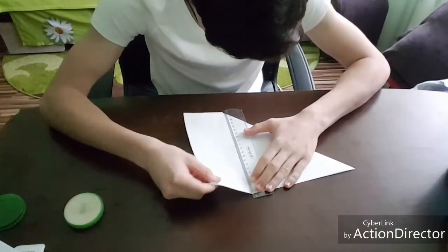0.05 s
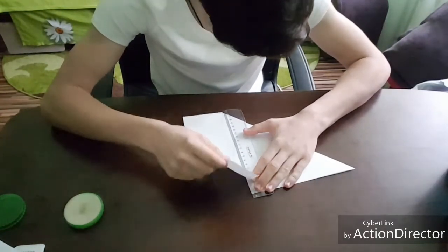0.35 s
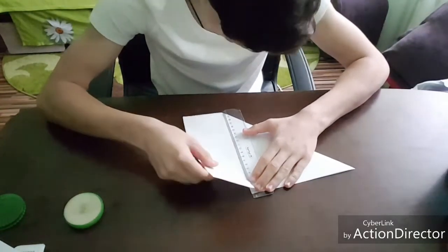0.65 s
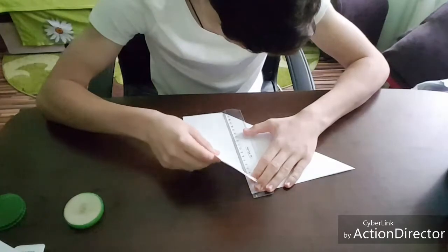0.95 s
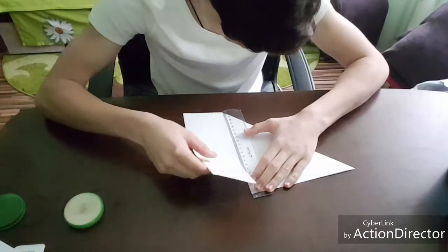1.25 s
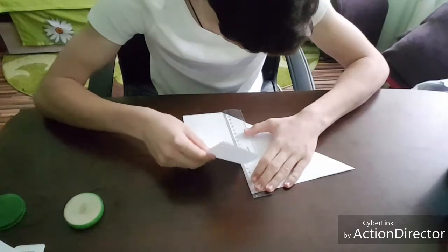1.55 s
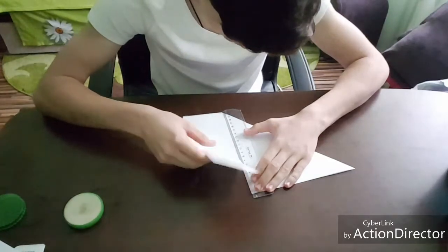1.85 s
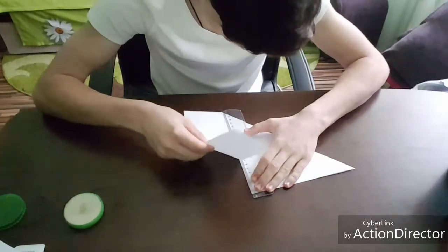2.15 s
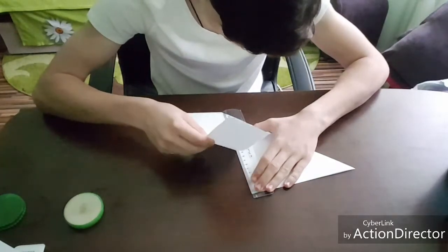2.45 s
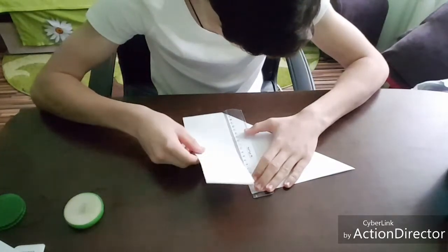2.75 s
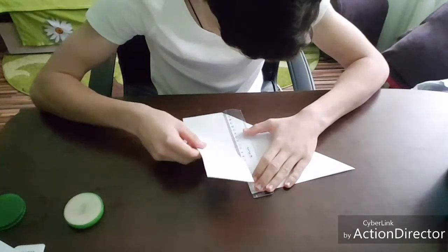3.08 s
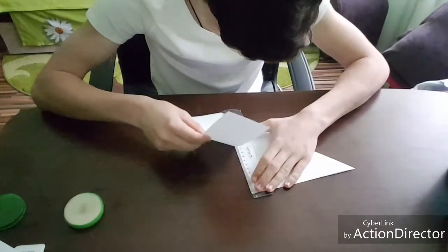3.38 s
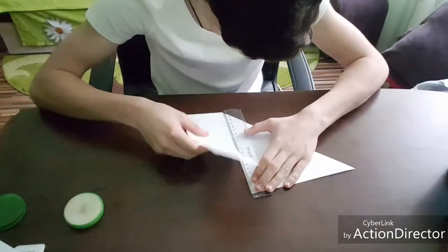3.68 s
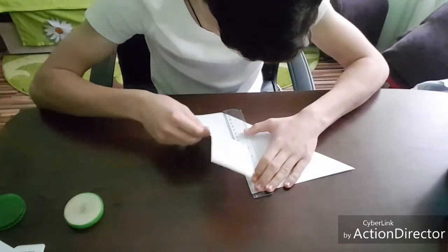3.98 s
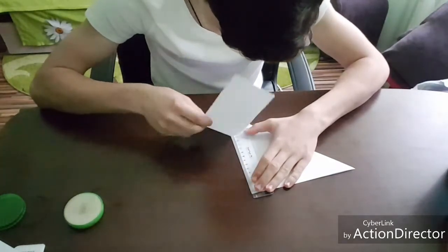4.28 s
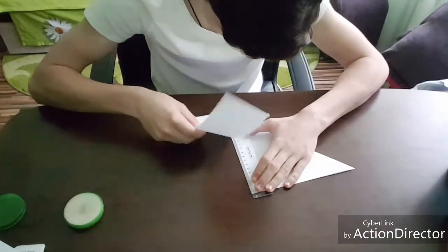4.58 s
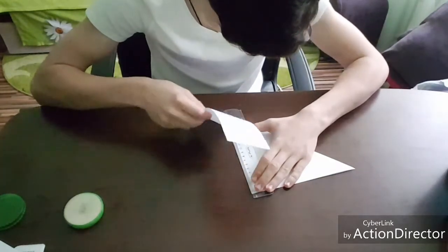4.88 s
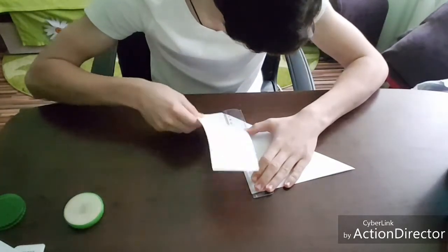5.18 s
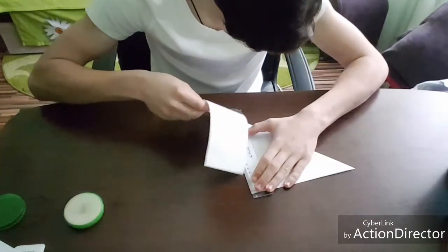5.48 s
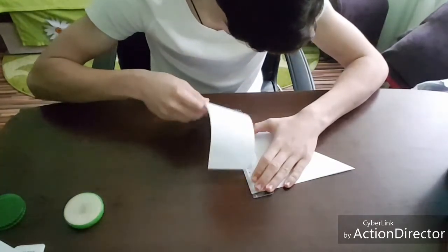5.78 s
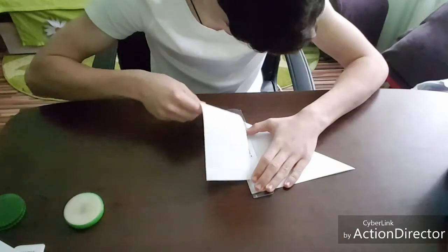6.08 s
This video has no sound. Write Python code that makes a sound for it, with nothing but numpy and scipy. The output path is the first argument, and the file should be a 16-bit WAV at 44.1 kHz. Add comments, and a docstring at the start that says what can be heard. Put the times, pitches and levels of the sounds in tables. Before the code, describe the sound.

Damp paper is torn by hand along a ruler in a series of short rips. Each is an uneven crackle with a few sharp snaps, a hollow rattle of the sheet and a low rumble through the wooden table. Between pulls the loose flap buckles with dull pops and whispers under the fingers. The microphone is close, in stereo, in a small quiet room.

```python
"""A small furnished room, close to a wooden table, in stereo: damp paper is torn along a ruler.
Each short rip is a run of uneven slips with a few loud cracks: a snap and an avalanche of breaking
fibres that also shakes the sheet. The tugs rumble through the table and boom in the taut flap;
between pulls the loose flap buckles with dull pops and slides under the fingers.
Short room reflections and a faint steady room tone lie behind the paper."""
import sys
import numpy as np
from scipy import signal
from scipy.fft import rfft, irfft, next_fast_len
from scipy.io import wavfile
from scipy.ndimage import uniform_filter1d

SR = 44100
rng = np.random.default_rng(int(sys.argv[2]) if len(sys.argv) > 2 else 0)


def persist_wave(psi):
    """Save psi, clipped to +-1, as 16-bit WAV."""
    counts = np.round(np.clip(psi, -1, 1) * 32767).astype(np.int16)
    wavfile.write(sys.argv[1], SR, np.atleast_2d(counts).T)


N = 274743

# pulls along the ruler: start_s, length_s, crackle_db, rattle_db, rumble_db
RIPS = [(0.267, 0.12, -39, -34, -58), (0.428, 0.01, -50, -50, -48.5), (0.987, 0.067, -51.5, -41, -47),
        (1.07, 0.068, -43.5, -38, -45), (1.631, 0.04, -55.5, -51.5, -56), (1.695, .12, -47.5, -48, -48.5),
        (2.318, 0.039, -42, -39.5, -48.5), (2.448, 0.026, -42.5, -38.5, -45.5),
        (2.52, 0.041, -53, -52, -53.5), (3.437, 0.064, -40.5, -41, -48.5), (4.185, 0.067, -39.5, -34, -47),
        (4.334, 0.072, -43.5, -43, -45.5), (4.825, 0.028, -55, -51, -53), (4.88, 0.13, -50.5, -43.5, -44.5),
        (5.501, 0.046, -42.5, -32.5, -48), (5.6, 0.012, -51, -46, -57), (5.658, 0.056, -41.5, -38, -75)]
# the loose flap buckles: time_s, level_db
FLAP_POPS = [(0.524, -45), (0.758, -56), (0.945, -29.5), (1.498, -54), (1.534, -51), (2.803, -47),
             (3.804, -44), (3.887, -33.5), (4.466, -34), (4.718, -40), (5.135, -40), (5.27, -39.5),
             (5.287, -44), (5.488, -32), (5.862, -46), (6.11, -40.5)]


def amp(db):
    """Decibels to gain."""
    return 10 ** (np.asarray(db) / 20)


def unit(x):
    """x at rms 1."""
    return x / np.sqrt(np.mean(x ** 2) + 1e-20)


def along(points, hz):
    """Rows of frequency_hz, value, read on a log frequency axis."""
    freqs, values = np.transpose(points)
    return np.interp(np.log(hz + 1), np.log(freqs + 1), values)


def filtered(x, response):
    """x through a filter whose gain is response(hz)."""
    size = next_fast_len(N + SR // 2)
    return irfft(rfft(x, size) * response(np.fft.rfftfreq(size, 1 / SR)), size)[..., :N]


def coloured(x, spectrum, size=4096):
    """x through a minimum-phase filter of energy 1 with the given spectrum."""
    gain = amp(along(spectrum, np.fft.rfftfreq(size, 1 / SR)))
    cepstrum = irfft(np.log(gain + 1e-6))
    cepstrum[1:size // 2] *= 2
    cepstrum[size // 2 + 1:] = 0
    ring = irfft(np.exp(rfft(cepstrum)))
    return signal.fftconvolve(x, ring[None] / np.linalg.norm(ring), axes=1)[:, :N]


def add(track, s, sound):
    """Lay a sound into a track at time s."""
    start = max(round(s * SR), 0)
    part = track[:, start:start + sound.shape[1]]
    part += sound[:, :part.shape[1]]


def swells(rows):
    """A bell-shaped gain for each movement: middle_s, length_s, level_db."""
    t = np.arange(0, N, 32) / SR
    power = sum(amp(db) ** 2 * np.exp(-(2 * (t - s) / length) ** 2) for s, length, db in rows)
    return np.interp(np.arange(N) / SR, t, np.sqrt(power))


def grains(count, rate_hz, spread_db):
    """Sparse impulses of scattered sizes, at rms 1."""
    occurs = rng.random(count) < rate_hz / SR
    size = amp(spread_db * np.clip(rng.standard_normal(count), -2, 2))
    sign = rng.choice([-1, 1], count)
    return unit(occurs * sign * size)


def avalanche(t60_s, snap, rate_hz, spread_db):
    """A snap, sized against the grains' rms, then dying grains that stop as the tension is spent."""
    t = np.arange(SR // 8) / SR
    tension = np.exp(-(t / .055) ** 4)
    envelope = amp(-60 * t / t60_s) * tension
    force = envelope * grains(len(t), rate_hz, spread_db)
    force[0] -= snap
    return force * np.linalg.norm(envelope) / np.linalg.norm(force)


def radiated(force, t60_s, scatter):
    """Mid and side sound of a force on the sheet: direct, plus waves that rebound from its edges."""
    t = np.arange(SR // 40) / SR
    waves = rng.standard_normal((2, len(t))) * amp(-60 * t / t60_s)
    waves *= scatter / np.linalg.norm(waves, axis=1, keepdims=True)
    waves[0, 0] += 1  # direct sound; the side gets it a few samples later
    waves[1, rng.integers(1, 8)] += rng.choice([-1, 1])
    waves /= np.linalg.norm(waves, axis=1, keepdims=True)
    return signal.fftconvolve(force[None], waves, axes=1)


def pull_db(age_s, length_s, sag_db_per_s=85.5, release_db_per_s=528):
    """The pull sags as the paper gives way, and lets go at the end of a rip."""
    return -sag_db_per_s * age_s - release_db_per_s * np.maximum(age_s - length_s, 0)


def cracks_and_slips(count=20):
    """Every advance of the tear: time_s, crackle_db, rattle_db, t60_s, snap."""
    # a tough bundle of fibres gives way at once: time_s, crackle_db, rattle_db
    cracks = [(0.24, -54, -49.5), (0.317, -28, -27), (0.386, -36.5, -37), (0.45, -45.5, -47),
              (0.484, -44.5, -47), (1.009, -40.5, -34.5), (1.103, -35, -33), (1.142, -38, -37.5),
              (1.671, -45, -43), (1.734, -41, -38.5), (1.7626, -30, -31.5), (2.278, -39, -44),
              (2.418, -52, -44), (2.48, -40.5, -39.5), (2.566, -41, -40), (3.392, -42.5, -44),
              (3.454, -33, -39.5), (3.486, -33.5, -32), (3.515, -39, -38.5), (4.21, -29, -51),
              (4.257, -33.5, -57), (4.296, -35, -41), (4.326, -27, -41), (4.84, -47, -48),
              (4.916, -39, -34.5), (4.939, -31, -25.5), (4.964, -28.5, -25.5), (5.395, -57, -46),
              (5.423, -44.5, -32.5), (5.452, -41, -26.5), (5.497, -29, -24.5), (5.539, -29.5, -25),
              (5.592, -40, -36), (5.694, -31.5, -29), (5.721, -35, -36.5)]
    crack_t60_s, crack_snap = .034, 3.4
    slip_t60_s, slip_snap = .059, 1.26
    gap_s, scatter_db, jerk_db = .008, 2, 4
    stall_s, stall_db = .016, 3.5  # a bundle holds up the tear just before it cracks
    rows = [(*crack, crack_t60_s, crack_snap) for crack in cracks]
    for s, length, crackle_db, rattle_db, _ in RIPS:
        ages = gap_s * (np.arange(count) + rng.uniform(-.5, .5, count))
        until_crack = np.array(cracks)[:, :1] - (s + ages)
        stalled = np.any((until_crack > 0) & (until_crack < stall_s), axis=0)
        levels = pull_db(ages, length) + scatter_db * rng.standard_normal(count) - stall_db * stalled
        ages[0], levels[0] = 0, jerk_db  # a rip opens with a stronger slip
        for age, db in zip(ages, levels):
            rows.append((s + age, crackle_db + db, rattle_db + db, slip_t60_s, slip_snap))
    return rows


def tear():
    """The same breaks are heard as bright fibre crackle and as the lower rattle of the taut sheet."""
    # tone of the breaking fibres: frequency_hz, level_db
    fibre_spectrum = [(1590, -22.5), (2700, -1.5), (3380, -5.5), (4410, -2), (5400, -6.5), (6120, -4),
                      (7600, -4.5), (8250, -1.5), (9430, -6.5), (10000, -4.5), (12500, -6), (15200, -12.5),
                      (16000, -36)]
    # hollow tone of the paper's rattle, as heard close to the table: frequency_hz, level_db
    rattle_spectrum = [(26, -47), (45, -44.5), (112, 2.5), (146, -5.5), (184, -3.5), (344, -3.5),
                       (442, -5.5), (715, -4), (870, -10), (1220, -2), (1330, -10), (1430, -4), (1940, -17),
                       (2240, -5.5), (3200, -36.5), (4160, -19.5), (7040, -120)]
    # how crisply the fibres break as the tear advances: time_s, treble_db
    crispness = [(.4, 1), (1.05, 5), (1.7, -2), (4.9, -3)]
    crackle, rattle = np.zeros((2, 2, N))
    for s, crackle_db, rattle_db, t60_s, snap in cracks_and_slips():
        force = avalanche(t60_s, snap, rate_hz=5500, spread_db=4.5)
        breaks = radiated(force, t60_s=.011, scatter=.45)
        add(crackle, s, amp(crackle_db) * breaks)
        add(rattle, s, amp(rattle_db) * breaks)
    treble = filtered(crackle, lambda hz: 1 / (1 + (10000 / (hz + 1)) ** 8))
    treble_db = np.interp(np.arange(N) / SR, *np.transpose(crispness))
    crackle += treble * (amp(treble_db) - 1)
    # a small sheet radiates little bass
    low_cut = signal.butter(2, 170, "highpass", fs=SR, output="sos")
    rattle = signal.sosfilt(low_cut, coloured(rattle, rattle_spectrum))
    return amp(-2.0) * coloured(crackle, fibre_spectrum) + amp(-2.03) * rattle


def table_rumble():
    """The jerky pull passes through ruler and hand into the table top, whose low modes rumble."""
    # modes of the table top: pitch_hz, width_hz, level_db
    modes = [(109, 26.4, 5), (182, 87, 3), (220, 53, 6.5), (374, 72, -4.5)]
    # the hand bumps the table: middle_s, length_s, level_db
    bumps = [(.66, 0.014, -48.5), (3.815, 0.04, -53.5), (4.2, 0.023, -44.5), (5.28, 0.052, -55.5)]
    nudge_s, nudge_db = .025, -21  # each pop of the flap also nudges the table
    nudges = [(s + nudge_s / 2, nudge_s, db + nudge_db) for s, db in FLAP_POPS]
    push = swells(bumps + nudges)[None]
    age = np.arange(SR // 4) / SR
    for s, length, _, _, rumble_db in RIPS:
        add(push, s, amp(rumble_db + pull_db(age, length))[None])

    def wood(hz):
        """The resonances summed with alternating signs."""
        return sum((-1) ** k * amp(db) * 1j * hz * width / (pitch ** 2 - hz ** 2 + 1j * hz * width)
                   for k, (pitch, width, db) in enumerate(modes))

    energy = np.mean(np.abs(wood(np.fft.rfftfreq(SR, 1 / SR))) ** 2)
    return amp(-3.0) * filtered(push * rng.standard_normal((2, N)), wood) / np.sqrt(energy)


def flap_booms(waver_hz=12.1):
    """The lowest mode of the taut flap; its pitch depends on the grip and wavers with the tension."""
    # the flap sounds briefly like a drum skin: middle_s, length_s, pitch_hz, level_db
    booms = [(0.416, 0.099, 245, -55), (1.1, 0.043, 210, -46), (3.497, .06, 172.4, -44.5),
             (4.36, 0.067, 184.3, -46), (4.946, 0.015, 384.7, -44), (5.458, 0.012, 400, -38.5),
             (5.509, 0.042, 325, -38)]
    sound = np.zeros((2, N))
    t = np.arange(-SR // 5, SR // 5) / SR
    for s, length, hz, db in booms:
        waver = unit(uniform_filter1d(rng.standard_normal(len(t)), size=600))
        phase = 2 * np.pi * np.cumsum(hz + waver_hz * waver) / SR
        envelope = amp(db) * np.exp(-2 * (t / length) ** 2)
        add(sound, s + t[0], envelope * np.array([np.sin(phase), np.cos(phase)]))
    return sound


def flap_pops(rise_s=.004):
    """The limp flap flips over with a soft, dull pop that takes a moment to build up."""
    # tone of the limp flap: frequency_hz, level_db
    flap_spectrum = [(50, -8), (200, -8.5), (350, -1.5), (520, -1.5), (720, -1), (1200, -0.5), (1750, -11),
                     (2400, -11), (3500, -28.5), (16000, -47)]
    pops = np.zeros((2, N))
    for s, db in FLAP_POPS:
        force = avalanche(t60_s=.061, snap=1.5, rate_hz=12000, spread_db=.5)
        force *= 1 - np.exp(-np.arange(len(force)) / SR / rise_s)
        add(pops, s - rise_s / 2, amp(db) * radiated(force, t60_s=.0076, scatter=.36))
    return amp(-2.5) * coloured(pops, flap_spectrum)


def paper_slides():
    """Paper rubs on skin and table: a fine, grainy whisper."""
    # fingers and flap slide: middle_s, length_s, level_db
    slides = [(.55, 0.032, -57), (.645, 0.15, -59.5), (1.41, 0.15, -63), (1.92, 0.024, -59.5),
              (2.03, 0.23, -61), (2.76, 0.2, -66), (3.145, 0.028, -66), (3.24, .05, -70.5),
              (3.675, 0.048, -60.5), (3.85, 0.18, -64), (4.09, 0.12, -70.5), (4.655, 0.064, -60.5),
              (5.03, 0.088, -61.5), (5.16, 0.024, -54.5), (5.28, 0.23, -62), (5.98, 0.22, -63)]
    # tone of the rubbing: frequency_hz, level_db
    rub_spectrum = [(60, -29), (140, 9), (300, 7), (700, -0.5), (1300, 1), (1850, -4.5), (2350, -0.5),
                    (3300, -7), (6000, -14), (15000, -19)]
    friction = np.array([grains(N, rate_hz=5000, spread_db=5.5) for _ in range(2)])
    return coloured(swells(slides) * friction, rub_spectrum)


def room_tail():
    """A short diffuse tail, longer in the bass, reaching the microphone 4 ms after the direct sound."""
    # ring-down of the room: frequency_hz, t60_s
    decay_times = [(150, 0.55), (700, 0.23), (13000, 0.27)]
    # strength of the reflections: frequency_hz, level_db
    levels = [(150, -10), (700, -7.5), (13000, -9.5)]
    hz, t, noise = signal.stft(rng.standard_normal((2, SR // 3)), SR, nperseg=256)
    decay = amp(-60 * t / along(decay_times, hz)[:, None])
    energy = np.sum(decay ** 2, axis=1, keepdims=True) * t[1] * SR
    decay *= amp(along(levels, hz))[:, None] / np.sqrt(energy)
    _, tail = signal.istft(noise * decay, SR, nperseg=256)
    return np.pad(tail, ((0, 0), (SR // 250, 0)))


def reflections(x, size=16384):
    """Smooth, diffuse room reflections; a fresh tail for each block keeps them from ringing."""
    wet = np.zeros((2, N))
    for start in range(0, N, size // 2):
        part = x[:, start:start + size]
        fade = np.sqrt(np.hanning(size))[:part.shape[1]]
        add(wet, start / SR, signal.fftconvolve(part * fade, room_tail(), axes=1))
    return wet


def room_tone():
    """A faint, steady, low rush."""
    # the quiet room: frequency_hz, level_db
    quiet_spectrum = [(20, -15), (50, -5.5), (180, -7), (600, -20), (2200, -25.5), (5500, -34),
                      (15000, -36.5)]
    return amp(-68.0) * coloured(rng.standard_normal((2, N)), quiet_spectrum)


def scene():
    """Paper and room at the microphone, turned from mid and side into left and right."""
    # stereo width: frequency_hz, side_over_mid_db
    width = [(40, -11), (140, -19), (330, -11), (700, -5), (1290, 0), (2380, -3), (4400, 0)]
    # stereo balance: frequency_hz, left_over_right_db
    lean = [(200, 1), (380, -4), (700, 3.5), (1290, -4), (2380, 2), (4400, -1), (8120, -2), (15000, 2)]
    paper = tear() + flap_booms() + flap_pops() + paper_slides() + table_rumble()
    mid, side = room_tone() + paper + reflections(paper)
    side = filtered(side, lambda hz: amp(along(width, hz)))
    left_right = np.array([mid + side, mid - side])
    return filtered(left_right, lambda hz: amp(np.outer([.5, -.5], along(lean, hz))))


def record(dry):
    """The microphone chain cuts off steeply at its band limit."""
    top_hz = 15900
    return filtered(dry, lambda hz: 1 / np.sqrt(1 + (hz / top_hz) ** 120))


dry = scene()
out = record(dry)
persist_wave(out)
```